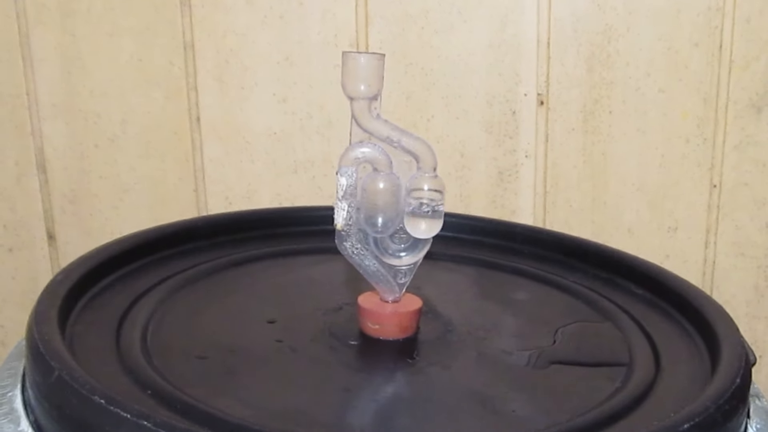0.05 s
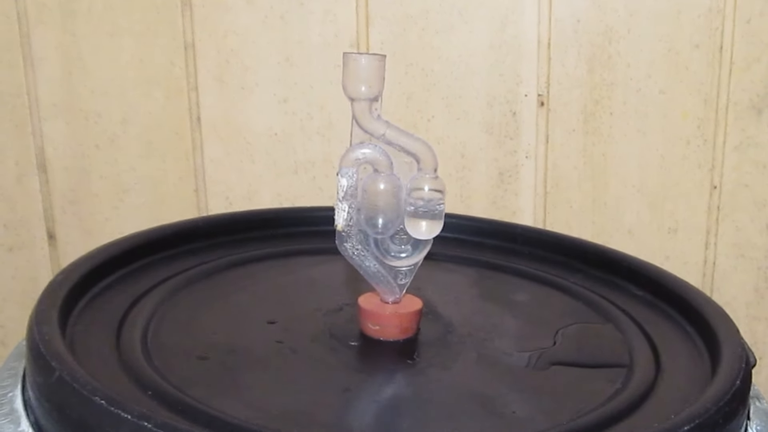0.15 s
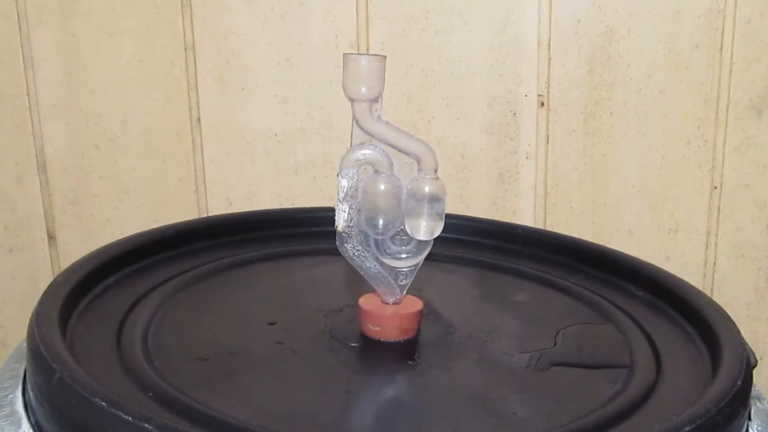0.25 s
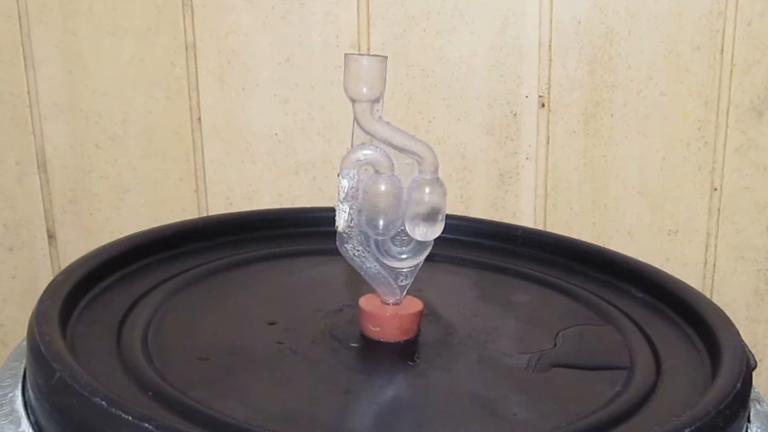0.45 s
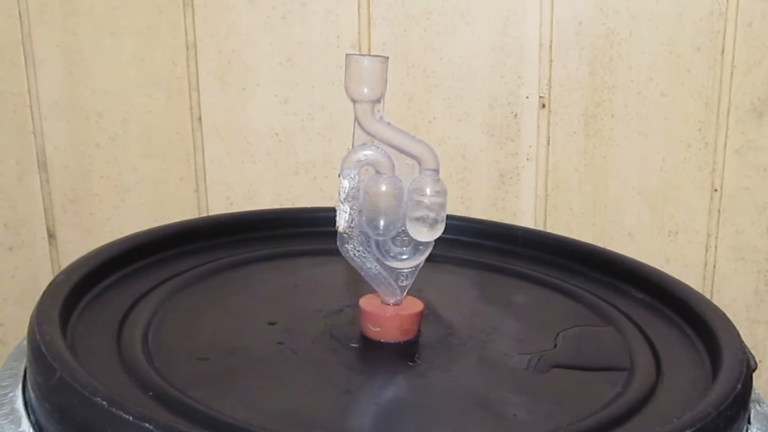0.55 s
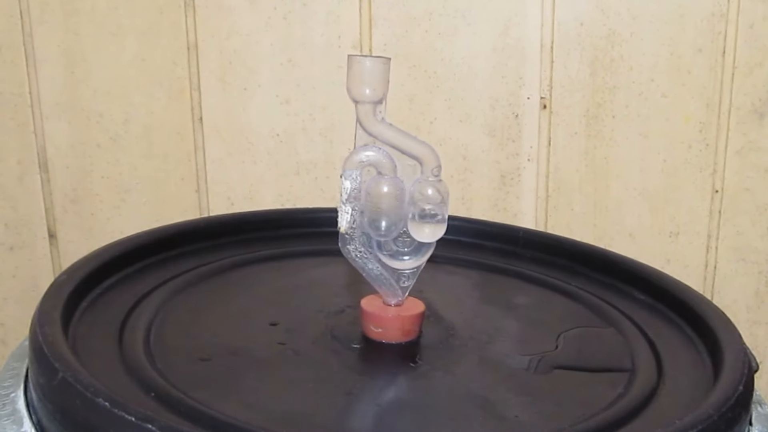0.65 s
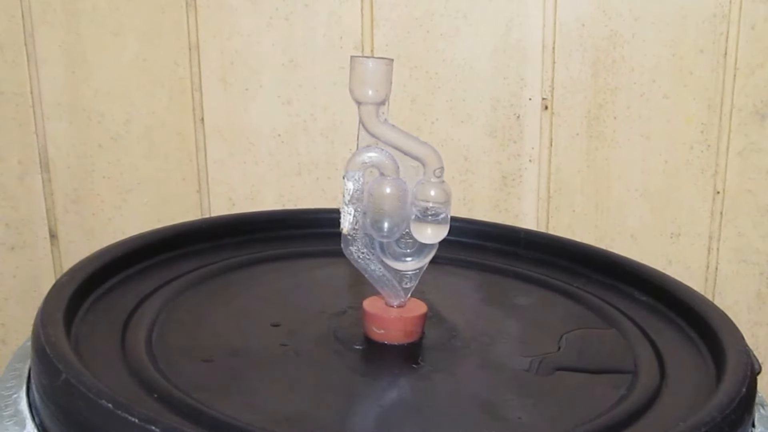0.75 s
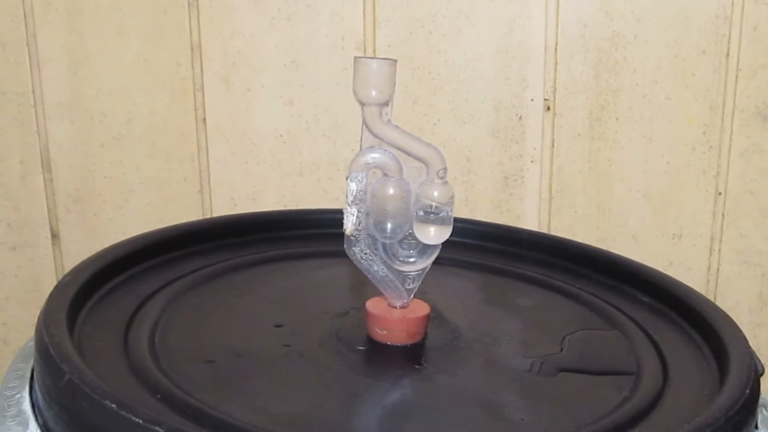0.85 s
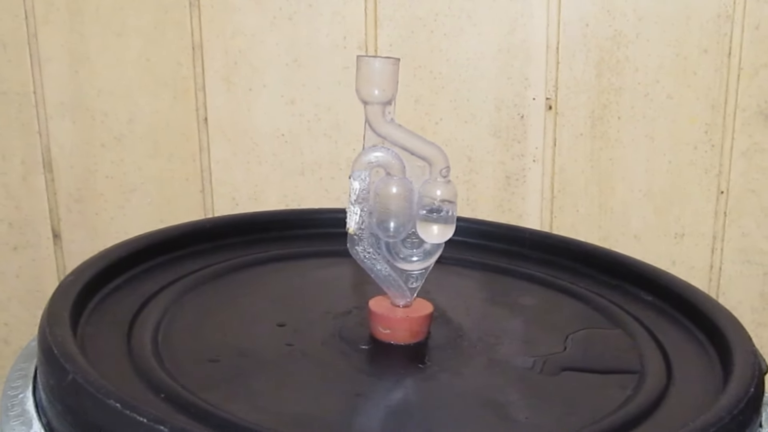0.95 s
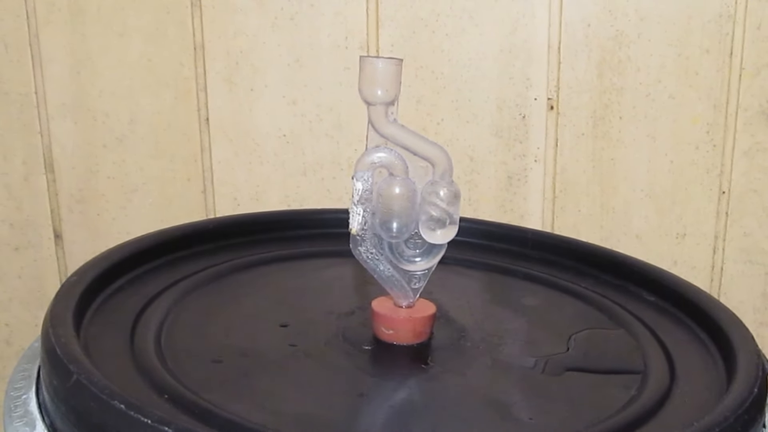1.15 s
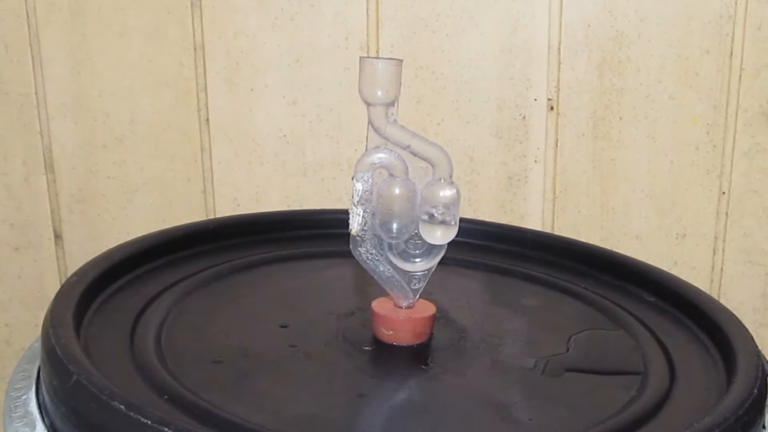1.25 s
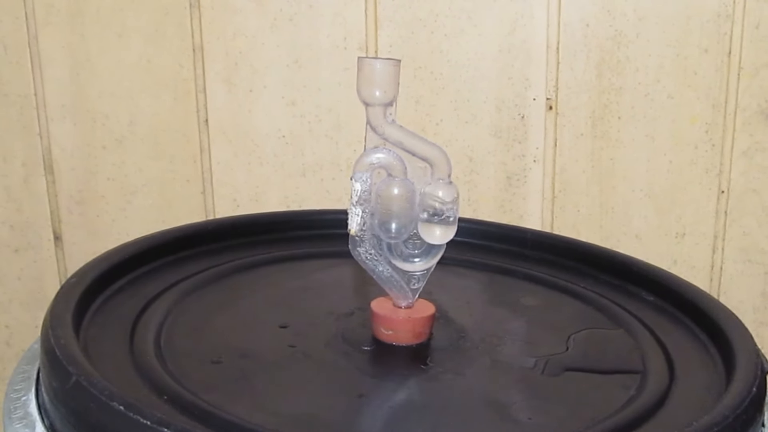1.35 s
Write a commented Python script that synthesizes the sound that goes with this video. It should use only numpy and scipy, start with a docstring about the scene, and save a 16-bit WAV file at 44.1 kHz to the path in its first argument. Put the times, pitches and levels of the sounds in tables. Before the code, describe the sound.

Water bubbling in a plastic airlock, two short bursts of wet gulps and ticks.

```python
"""Wet gulps, small bubbles and ticks from a plastic airlock, close by in a small quiet room.
Gas from a fermenting barrel pushes through the airlock's water. Each gulp rings with a rising pitch
and nudges the barrel. Smaller bubbles follow as the water settles, and their films burst with wet
ticks that ring in the airlock's tube. Behind it all are soft room noise and a low rumble."""
import sys
import numpy as np
from scipy import signal
from scipy.fft import rfft, irfft, next_fast_len
from scipy.io import wavfile
from scipy.ndimage import map_coordinates

SR = 44100
rng = np.random.default_rng(int(sys.argv[2]) if len(sys.argv) > 2 else 0)


def digitize_waveform(pressure):
    """Quantize a signal to 16-bit integers and store it at the path in sys.argv[1].

    Rows of a 2-D input are taken as channels; values are limited to [-1, 1].
    """
    field = np.atleast_2d(pressure).T
    bounded = np.clip(field, -1, 1)
    quanta = np.round(bounded * 32767).astype(np.int16)
    wavfile.write(sys.argv[1], SR, quanta)


N = 61739
T = np.arange(SR // 2) / SR  # the half second that each sound gets, in s

# pitches at which the airlock's tube rings: f/Hz, width/Hz, relative level/dB
TUBE_RESONANCES = [(1420, 410, 3), (1932, 142, 10.5), (2234, 120, 7.5), (2890, 350, 8), (3510, 390, 1),
                   (4200, 860, -3), (6260, 73, -5.5), (6720, 210, -6), (8570, 800, -10.5),
                   (9620, 2000, -13), (13600, 1600, -47)]


def gulps():
    """Big bubbles push through the airlock's bend, each with a faint splash and a nudge to the barrel."""
    # t/s, start f/Hz, end f/Hz, level/dB, rise/s, 60 dB fade/s, push on the barrel/dB
    big_bubbles = [(.2328, 667, 747, -24.5, 0.0056, 0.038, -37),
                   (0.3841, 555, 1019, -16.5, 0.0026, 0.02, -40),
                   (.4845, 547, 854, -23.5, 0.0019, 0.026, -39.5),
                   (0.975, 664, 783, -23.5, 0.0063, 0.033, -33.5),
                   (1.0894, 464, 804, -24.5, 0.0018, 0.004, -39.5)]
    track = np.zeros((2, N))
    for start, start_hz, end_hz, db, rise, t60, push_db in big_bubbles:
        noise = rng.standard_normal(len(T))
        wet_noise = unit(filtered(noise, lambda hz: resonances(hz, TUBE_RESONANCES[:5])))
        splash = amp(db - 32.5) * wet_noise * envelope(rise=0.0029, t60=0.035)
        ring = bubble(start_hz, end_hz, db, rise, t60)
        add(track, start, in_room(ring + splash + amp(push_db) * barrel()))
    return track


def small_bubbles():
    """Smaller bubbles ring as the water settles. They nudge the barrel too, the large low ones most."""
    # t/s, start f/Hz, end f/Hz, level/dB, rise/s, 60 dB fade/s
    wake = [(.2305, 2227, 2180, -48, 0.00082, 0.16), (.254, 740, 720, -43, 0.0034, 0.025),
            (.257, 1880, 1920, -47.5, 0.0056, 0.1), (.261, 850, 970, -30.5, 0.00094, .02),
            (.269, 1090, 1186, -36.5, 0.0055, 0.042), (0.276, 1453, 1564, -31, 0.005, 0.021),
            (.283, 1750, 1830, -24.5, 0.0043, .026), (.290, 545, 535, -24.5, 0.0014, 0.029),
            (0.297, 3020, 3050, -34, 0.0032, .02), (.299, 6720, 6850, -37, 0.0021, 0.036),
            (0.3, 5950, 6130, -39, 0.0022, .025), (.300, 2156, 2212, -36.5, .002, 0.086),
            (.392, 892, 1160, -32, 0.0058, 0.092), (.400, 422, 443, -34, .004, 0.082),
            (.429, 860, 780, -58, 0.0019, 0.033), (0.4298, 2880, 2904, -36.5, 0.0015, 0.036),
            (0.43, 1746, 1863, -34.5, 0.006, 0.019), (0.43, 6030, 5980, -41, 0.0024, 0.018),
            (.436, 600, 560, -24.5, 0.003, 0.01), (.451, 630, 595, -24.5, 0.0017, 0.013),
            (.454, 2046, 2104, -38.5, 0.00099, 0.084), (.458, 1520, 1574, -40, 0.0025, 0.045),
            (0.485, 448.5, 515.4, -32.5, 0.0044, 0.11), (.494, 790, 1012, -35, 0.0039, 0.056),
            (.526, 528, 533, -47, 0.0035, 0.056), (.847, 4560, 4750, -54.5, .001, 0.027),
            (1.001, 346, 310, -32, 0.0027, 0.032), (1.003, 892, 1105, -35.5, 0.0013, 0.1),
            (1.0, 3050, 2990, -48, .002, 0.02), (1.010, 553, 636, -41.5, 0.0034, 0.1),
            (1.012, 2810, 2820, -46.5, 0.0023, .035), (1.031, 2660, 2870, -45.5, .003, 0.022),
            (1.036, 530, 570, -34, .003, 0.01), (1.041, 1110, 1204, -34.5, 0.0017, 0.022),
            (1.050, 566, 547, -33.5, 0.006, 0.018), (1.052, 1984, 2100, -38, 0.00067, 0.054),
            (1.054, 1512, 1384, -27, 0.0013, .04), (1.07, 1892, 1893, -46.5, 0.0058, 0.12),
            (1.092, 1480, 1423, -38, 0.0012, 0.046), (1.096, 2480, 2583, -33.5, 0.0012, 0.032)]
    push_db, push_cutoff_hz = -14, 840
    track = np.zeros((2, N))
    for start, start_hz, end_hz, db, rise, t60 in wake:
        push = amp(db + push_db) / (1 + (start_hz / push_cutoff_hz) ** 2)
        ring = bubble(start_hz, end_hz, db, rise, t60)
        add(track, start, in_room(ring + push * barrel()))
    return track


def bubble(start_hz, end_hz, db, rise, t60):
    """A pocket of gas rings. Its pitch glides as it nears the surface, and its shape quivers ever more."""
    quiver_share, quiver_db, quivers_per_s = 0.026, 2.5, 227
    glide_s = rise + 0.159 * t60
    age = np.tanh(T / glide_s)  # goes from 0 towards 1
    glide_hz = start_hz + (end_hz - start_hz) * age
    hz = glide_hz * (1 + quiver_share * age * wobble(quivers_per_s))
    gain = amp(db + quiver_db * age * wobble(quivers_per_s))
    return gain * envelope(rise, t60) * np.sin(2 * np.pi * np.cumsum(hz) / SR)


def bursting_films():
    """Each bursting bubble film is a puff of noise that rings in the tube as a wet tick."""
    # t/s, level/dB, rise/s, 60 dB fade/s, tilt above 1 kHz/(dB per octave), top edge f/Hz
    bursts = [(0.0496, -61.5, 0.00089, 0.0091, 12, 10700), (0.147, -58, .0005, .008, 11, 11000),
              (0.181, -55, 0.00039, 0.0059, 6, 8100), (0.229, -55.5, 0.00054, 0.039, 8, 10500),
              (0.275, -40.5, 0.00037, 0.094, 3, 12400), (.298, -34, 0.002, 0.05, 3.5, 8300),
              (.427, -42, 0.0021, 0.023, 4.5, 6700), (.4305, -39, 0.00049, 0.034, -0.5, 9000),
              (.452, -42, 0.00075, 0.065, -3, 10100), (0.8468, -50, 0.0013, 0.016, 7.5, 9000),
              (0.999, -53, .012, 0.14, 0, 6750), (1.027, -48.5, 0.0027, 0.084, -1.5, 8100),
              (1.0504, -38.5, 0.00097, .016, -0.5, 15000), (1.082, -52.5, 0.0025, .016, 10.5, 10600)]
    track = np.zeros((2, N))
    for start, db, rise, t60, tilt_db, top_hz in bursts:
        shape = envelope(rise, t60)
        puff = shape * rng.standard_normal(len(T))
        tilt = lambda hz: amp(tilt_db * np.log2(np.maximum(hz, 1000) / 3000))
        top_cut = lambda hz: 1 / np.sqrt(1 + (hz / top_hz) ** 10)
        tick = filtered(puff, lambda hz: resonances(hz, TUBE_RESONANCES) * tilt(hz) * top_cut(hz))
        tick *= np.linalg.norm(shape) / np.linalg.norm(tick)  # same energy whatever its tone
        add(track, start, in_room(amp(db) * tick, left_db=-0.8))
    return track


def barrel():
    """A nudge makes the barrel and its lid ring with a few low notes."""
    # the barrel's notes: f/Hz, relative level/dB, 60 dB fade/s
    notes = [(74.6, -16, 0.31), (210, -6.5, 0.013), (266.6, -3, .14), (411.2, -9, 0.18)]
    return sum(amp(db) * envelope(0.0021, t60) * np.sin(2 * np.pi * hz * T) for hz, db, t60 in notes)


def in_room(sound, left_db=-1.44):
    """Adds quick echoes off near walls and the room's tail. Left gets left_db, right the opposite."""
    # how long the room rings: f/Hz, 60 dB fade/s
    fade_times = [(100, 0.2), (270, 0.32), (600, 0.22), (2000, 0.21), (6000, 0.18), (14000, .13)]
    # how wide the echo spreads: f/Hz, gain of the left-right difference
    widths = [(100, .3), (500, 0.19), (1200, 0.36), (2500, 1), (10000, 1)]
    tail_db, walls_db, walls_delay_s = -9.5, -8, 0.004
    hz, t, spectrum = signal.stft(rng.standard_normal((2, len(T))), SR, nperseg=256)
    spectrum *= fade(t, along(fade_times, hz)[:, None])
    tail = signal.istft(spectrum, SR, nperseg=256)[1][:, :len(T)]
    walls = rng.standard_normal((2, len(T))) * fade(T, t60=0.057)
    echo = amp(tail_db) * tail / np.linalg.norm(tail[0])
    echo += amp(walls_db) * walls / np.linalg.norm(walls[0])
    echo = np.pad(echo, ((0, 0), (round(walls_delay_s * SR), 0)))
    mid, side = signal.fftconvolve(sound[None], echo, axes=1)[:, :len(T)]
    side = filtered(side, lambda hz: along(widths, hz))
    return np.array([sound + mid + side, sound + mid - side]) * amp([[left_db], [-left_db]])


def room_air():
    """The soft, steady noise of the room's air, only partly alike in the two ears."""
    # tone of the air: f/Hz, relative level/dB
    tone = [(15, -49), (25, -9), (75, -3), (204, -3.5), (368, -5), (567, -1.5), (684, -8), (762, -4),
            (1110, -1.5), (1950, -11), (3630, -13), (4040, -15), (4620, -16.5), (7910, -23.5),
            (9810, -24.5), (11800, -31.5), (15500, -37)]
    # how alike left and right are: f/Hz, likeness (1 = the same)
    likeness = [(60, 0.28), (180, 0.072), (550, 0.31), (1650, 0.16), (4970, 0.15), (15000, 0.13)]
    # left-right balance: f/Hz, left minus right/dB
    balance = [(60, -2), (240, 0.5), (950, -4), (3770, -1), (15000, -1.0)]
    spread = lambda hz: np.arccos(along(likeness, hz)) / 2
    mid_side_gains = lambda hz: amp(along(tone, hz)) * [np.cos(spread(hz)), np.sin(spread(hz))]
    mid, side = filtered(rng.standard_normal((2, N)), mid_side_gains)
    left_right = np.array([mid + side, mid - side])
    air = filtered(left_right, lambda hz: amp(along(balance, hz) * [[0.5], [-0.5]]))
    return amp(-56) * unit(air)


def rumble():
    """A faint low rumble that swells once near the end."""
    pitch_hz, width_hz = 61.5, 16
    swell_at_s, swell_width_s, swell_db = 1.355, 0.043, 12
    noise = filtered(rng.standard_normal(N), lambda hz: resonances(hz, [(pitch_hz, width_hz, 0)]) ** 2)
    swell = np.exp(-((np.arange(N) / SR - swell_at_s) / swell_width_s) ** 2)
    return amp(-77.5 + swell_db * swell) * unit(noise)


def amp(db):
    """Turns decibels into a gain."""
    return 10 ** (np.asarray(db) / 20)


def unit(x):
    """Scales a sound to an average (rms) level of 1."""
    return x / np.sqrt(np.mean(x ** 2) + 1e-20)


def along(points, hz):
    """Reads a curve of (f/Hz, value) points at hz, on a log frequency scale."""
    point_hz, values = np.transpose(points)
    return np.interp(np.log(hz + 1), np.log(point_hz + 1), values)


def filtered(x, response):
    """Multiplies each frequency in x by response(hz)."""
    n = x.shape[-1]
    size = next_fast_len(n + SR // 2)
    return irfft(rfft(x, size) * response(np.fft.rfftfreq(size, 1 / SR)), size)[..., :n]


def resonances(hz, peaks):
    """The response of something that rings at peaks of (f/Hz, width/Hz, level/dB)."""
    return sum((-1) ** k * amp(db) * 1j * hz * width / (centre ** 2 - hz ** 2 + 1j * hz * width)
               for k, (centre, width, db) in enumerate(peaks))


def fade(t, t60):
    """Falls by 60 dB in t60 seconds."""
    return np.exp(-np.log(1000) * t / t60)


def envelope(rise, t60):
    """Swells smoothly for rise seconds, then fades."""
    return np.sin(np.pi / 2 * np.minimum(T / rise, 1)) * fade(np.maximum(T - rise, 0), t60)


def wobble(rate):
    """A smooth curve through rate random points a second."""
    return map_coordinates(rng.standard_normal(len(T)), [T * rate], order=3)


def add(track, start, sound):
    """Mixes a sound into the track at start seconds."""
    part = track[:, round(start * SR):][:, :len(T)]
    part += sound[:, :part.shape[1]]


def scene():
    """The bubbling airlock in its quiet room."""
    return gulps() + small_bubbles() + bursting_films() + room_air() + rumble()


def record(dry):
    """Cuts off the very highest treble."""
    return filtered(dry, lambda hz: hz < 15750)


dry = scene()
out = record(dry)
digitize_waveform(out)
```